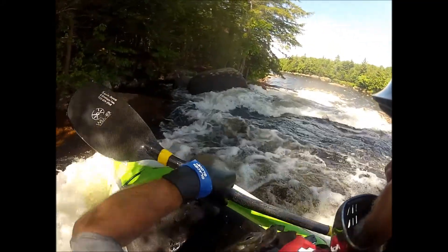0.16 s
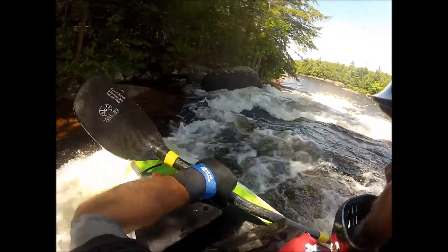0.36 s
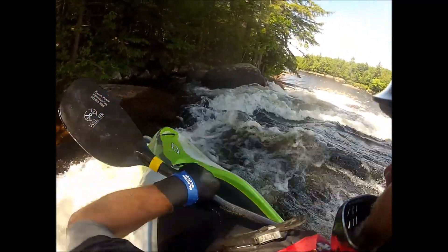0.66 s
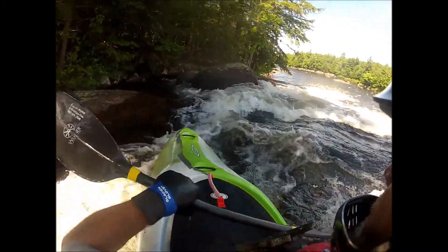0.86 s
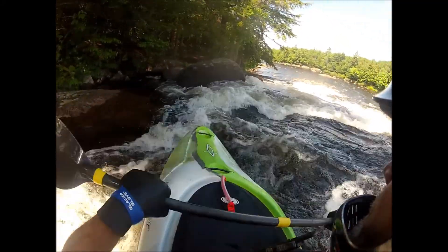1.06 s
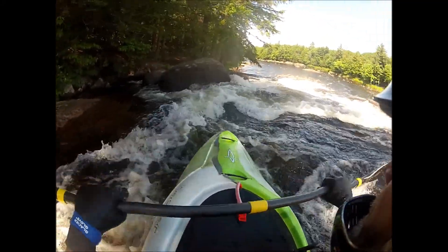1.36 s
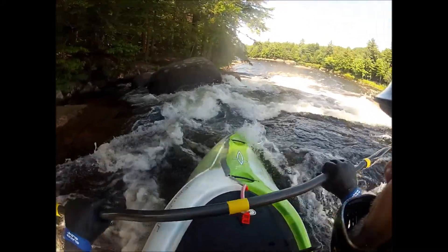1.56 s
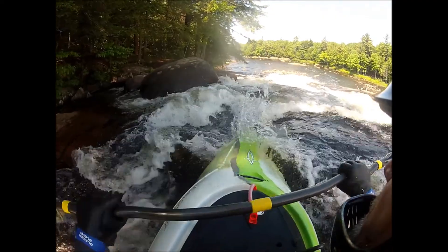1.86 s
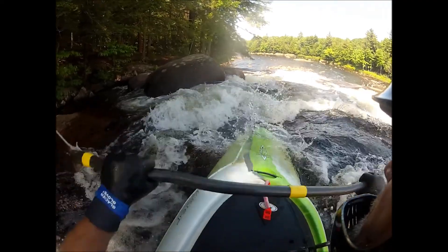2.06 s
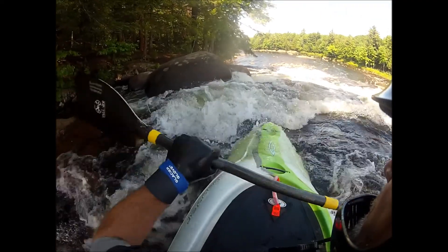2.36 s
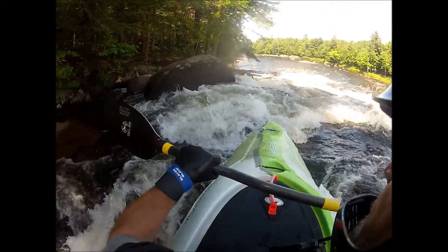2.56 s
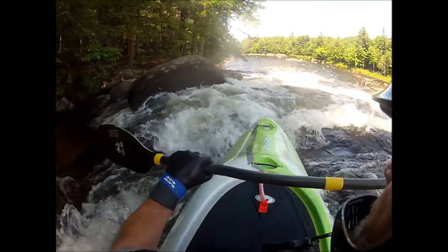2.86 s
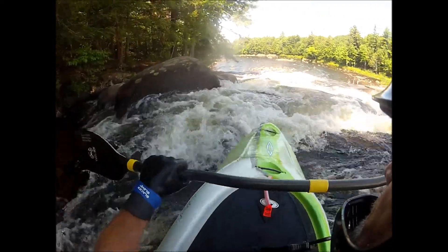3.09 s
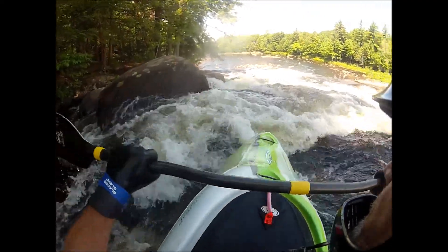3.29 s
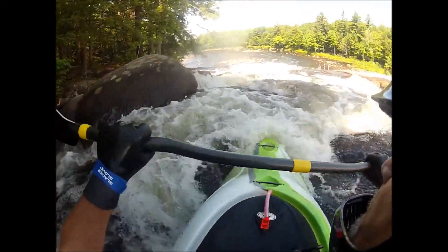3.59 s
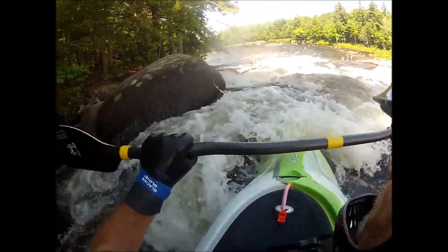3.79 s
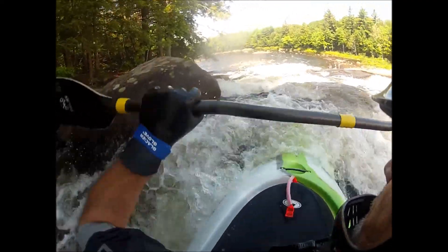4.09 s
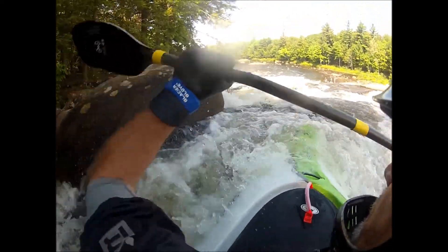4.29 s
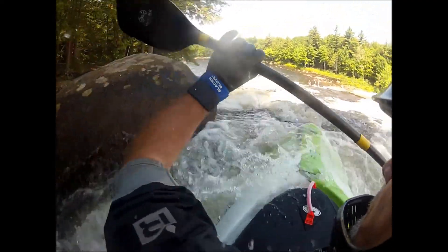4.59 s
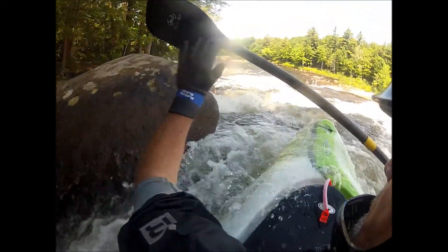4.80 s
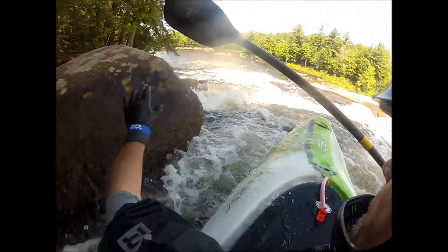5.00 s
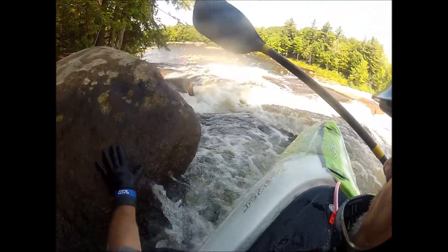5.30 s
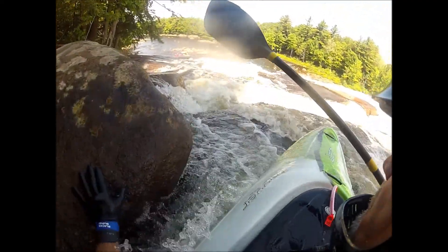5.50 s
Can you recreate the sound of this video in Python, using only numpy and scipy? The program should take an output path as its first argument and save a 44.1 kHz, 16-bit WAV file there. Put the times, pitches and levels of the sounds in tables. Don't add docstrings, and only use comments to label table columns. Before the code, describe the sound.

White water roars, muffled and boxy inside a sealed camera case, with hollow plastic raps, low hull thumps and deep jolting rumbles growing rougher midway.

```python
import sys
import numpy as np
from scipy import signal
from scipy.fft import rfft, irfft, next_fast_len
from scipy.io import wavfile
from scipy.ndimage import uniform_filter1d, map_coordinates

SR = 44100
rng = np.random.default_rng(int(sys.argv[2]) if len(sys.argv) > 2 else 0)


def to_wav(sig):
    pcm = np.clip(np.atleast_2d(sig), -1, 1) * 32767
    pcm = np.round(pcm).astype(np.int16)
    wavfile.write(sys.argv[1], SR, pcm.T)


def gain_from_db(level_db):
    decades = np.asarray(level_db, float) / 20
    return 10 ** decades


N = 249165

# (time [s], offset [dB], recovery [s])
OVERLOAD_JUMP = (3.7955, -9.5, .011)
LAPPING_DB = -46.5


def unit(x):
    return x / np.sqrt(np.mean(x ** 2) + 1e-20)


def curves(rows):
    s, *cols = np.transpose(rows)
    return [np.interp(np.arange(N) / SR, s, c) for c in cols]


def wobble(rate):
    return map_coordinates(rng.standard_normal(size=256), [np.arange(N) * rate / SR])


def filtered(x, response):
    m = next_fast_len(len(x) + 8192)
    spectrum = rfft(np.pad(x, (0, m - len(x)), "reflect"))
    return irfft(spectrum * response(np.fft.rfftfreq(m, 1 / SR)), m)[:len(x)]


def shape(points):
    f, v = np.transpose(points)
    return lambda hz: gain_from_db(np.interp(np.log(hz + 1), np.log(f + 1), v))


def froth(patchy_db):
    z = signal.stft(rng.standard_normal(N), nperseg=1024)[2]
    field = uniform_filter1d(rng.standard_normal(z.shape), 8, 0)
    field = uniform_filter1d(field, 4, 1)
    return signal.istft(z * gain_from_db(patchy_db * unit(field)), nperseg=1024)[1][:N]


def rapid():
    # (time [s], roar level [dB])
    nearness = [(0.0, -39), (0.57, -39.5), (1.01, -40.5), (1.21, -41), (1.56, -41), (1.89, -43),
                (3.11, -41.5), (3.32, -42.5), (3.52, -37), (3.67, -41), (3.9, -40), (4.26, -40.5),
                (4.58, -43.5), (4.8, -42.5), (5.16, -42), (5.37, -41.5), (5.52, -41.5), (5.65, -43.5)]
    # (frequency [Hz], width [Hz], level [dB])
    resonances = [(518, 116, -7), (857, 121, -5), (1116, 148, -4), (1257, 53.5, 2.5), (1450, 60, -8)]
    # (frequency [Hz], level per Hz [dB])
    surge_tone = [(120, -27.5), (190, -0.5), (250, -1), (400, -3.5), (600, -9), (1000, -36)]
    # (frequency [Hz], level per Hz [dB])
    spray_tone = [(900, -40.5), (1400, 1.5), (1700, -0.5), (2300, -0.5), (2700, -1), (2900, -7),
                  (2990, -28), (3010, -87)]

    roar_db, = curves(nearness)
    near_db = roar_db - roar_db.mean()
    waves_db = uniform_filter1d(pounding() - LAPPING_DB, size=SR // 3)
    surge_db = -47 + 0.18 * near_db + 0.58 * waves_db
    spray_db = -48.5 + 0.69 * near_db - 0.5 * np.arange(N) / SR
    swell = wobble(9.8)
    flutter = wobble(25)

    def cavity(f):
        total = 0
        for k, (centre, width, db) in enumerate(resonances):
            damping = 1j * f * width
            total = total + (-1) ** k * gain_from_db(db) * damping / (centre * centre - f * f + damping)
        return total / (1 + (f / 1500) ** 8)

    roar = unit(filtered(froth(patchy_db=1.5), cavity))
    surge = unit(filtered(froth(patchy_db=1.43), shape(surge_tone)))
    spray = unit(filtered(froth(patchy_db=1.0), shape(spray_tone)))
    roar = gain_from_db(roar_db + 2.0 + 0.6 * swell + 0.29 * flutter) * roar
    return roar + gain_from_db(surge_db) * surge + gain_from_db(spray_db + 0.49 * swell) * spray


def sway():
    # (time [s], pitch [Hz], level [dB])
    jolts = [(-0.016, 33.0, -26.5), (0.317, 32.0, -35.5), (0.379, 16.0, -30), (0.567, 16, -34),
             (0.898, 30.5, -34), (1.228, 31.0, -39.5), (1.788, 29.0, -39), (2.311, 13, -30),
             (2.331, 29.5, -41), (2.61, 31.5, -25), (2.983, 32.0, -33), (3.288, 29.0, -35.5),
             (3.345, 14.0, -27), (3.521, 17.0, -23.5), (3.542, 26, -22), (3.612, 34.0, -22),
             (3.825, 22, -15), (3.835, 31.0, -25.5), (4.057, 30.0, -12.5), (4.342, 27.0, -23.5),
             (4.441, 31.0, -20), (4.459, 15.55, -18.5), (4.603, 30, -31.5), (4.805, 14.0, -30.5),
             (4.989, 30, -33), (5.224, 14.0, -31.5), (5.302, 22, -30), (5.399, 19.0, -33),
             (5.528, 33.5, -32), (5.6, 19, -34)]
    rise_s, ring_s = .015, .12
    loose_db, tremble_db = -18, -49.5
    restless = .1

    ringing, shaking = np.zeros(N), np.zeros(N)
    for s, hz, db in jolts:
        t = np.maximum(np.arange(N) / SR - s, 0)
        reach = gain_from_db(db) * (1 - np.exp(-t / rise_s)) * np.exp(-t / ring_s)
        ringing += reach * np.sin(2 * np.pi * hz * t)
        shaking += reach
    noise = rng.standard_normal(N)
    rumble_tone = shape([(8, -37.5), (20, 10.5), (42, 6.0), (65, -11.0), (120, -33.5)])
    tremble_tone = shape([(8, -34), (16, -2), (24, -5), (31, -4.0), (45, -17), (90, -50)])
    rumble = unit(filtered(noise, rumble_tone))
    tremble = unit(filtered(noise[::-1], tremble_tone))
    tremble_level = gain_from_db(tremble_db) + restless * uniform_filter1d(shaking, size=SR)
    return ringing + gain_from_db(loose_db) * shaking * rumble + tremble_level * tremble


def held(x):
    padded = np.pad(x, (0, 147 * 1750 - N), "reflect")
    coarse = signal.resample(padded, 20 * 1750)
    return signal.resample(np.repeat(coarse, 8), 147 * 1750)[3:N + 3]


def pounding():
    # (time [s], level [dB], length [s])
    waves = [(.14, -44, 0.036), (.49, -44, .05), (1.0, -46, 0.072), (1.3, -46.5, .08), (2.36, -46, 0.065),
             (2.49, -47.5, .03), (2.61, -41.5, 0.02), (2.753, -45.5, .06), (3.272, -38.5, 0.045),
             (3.425, -42.5, .06), (3.62, -42.5, .14), (3.824, -34.5, 0.053), (4.071, -39.5, 0.023),
             (4.189, -37, .08), (4.407, -34.5, .04), (4.45, -43, .03), (4.565, -46, 0.045), (5.5, -50, .04)]
    t = np.arange(N) / SR
    power = gain_from_db(LAPPING_DB) ** 2
    for s, db, length in waves:
        power = power + gain_from_db(db) ** 2 * np.exp(-((t - s) / length) ** 2)
    return 10 * np.log10(power)


def hull():
    # (frequency [Hz], level per Hz [dB])
    thump_tone = [(25, -31.5), (50, -3), (75, -2), (130, 0), (180, -4.5), (260, -31)]
    return gain_from_db(pounding()) * unit(filtered(froth(patchy_db=1.24), shape(thump_tone)))


def raps():
    # (time [s], peak [dB], hollow mode [dB], thud [dB], contact [s])
    knocks = [(.3454, -28.5, -11.5, -20, .001), (.382, -33, -5, -24, 0.0013),
              (0.7343, -28.5, -2, -14.5, .0012), (1.512, -32, -18, -17, 0.017),
              (2.5662, -14, -9, -31, .00092), (2.587, -33, -24, -11, 0.0032),
              (3.5753, -24.5, -2, -5.5, 0.0045), (3.7900, -4, -11, -27.5, 0.0037),
              (3.8063, -21, -5.5, -6, .002), (3.8303, -22.5, -3.5, -2, .003),
              (4.0541, -26.5, -3.5, -1, 0.0044), (4.432, -38, 0, 1.5, .004),
              (4.5394, -25.5, -5.5, -9, .006), (4.555, -32, -5, -6, 0.0028),
              (4.585, -25.5, -9.5, -11.5, 0.0023), (4.880, -21.5, -14.5, -23.5, 0.004),
              (4.942, -36, -1, -15, 0.0032), (4.9614, -34, -6, -12.5, 0.008), (4.980, -37, -0.5, -17, .01),
              (5.4601, -14, -9, -28, .002), (5.4855, -28.5, -12, -15, 0.0027)]
    # (frequency [Hz], level [dB], time to fall 60 dB [s],
    # family [whole part: 0 main, 1 hollow, 2 thud, 3 bright])
    modes = [(1120, -1.5, 0.024, 0.5), (1200, -2.5, 0.018, 0.9), (943, -5.5, 0.053, 1),
             (785, 1.5, 0.041, 1.5), (444, -1.5, 0.034, 2.5), (344, -8, 0.02, 2), (205, -0.5, 0.034, 2),
             (1900, 0, 0.028, 3)]
    hard_db = -21.5
    splat_db, splat_t60_s = -2.5, 0.055

    out = np.zeros(N + SR)
    t = np.arange(SR // 8) / SR - .004
    luck = rng.standard_normal((len(knocks), len(modes), 3))
    cracks = rng.standard_normal((len(knocks), len(t)))
    for (s, db, hollow_db, thud_db, contact), draw, crack in zip(knocks, luck, cracks):
        bright_db = -22 + 0.56 * max(db - hard_db, 0)
        family_db = [0, hollow_db + 4.0, thud_db + 4.0, bright_db + 1.5]
        smear = np.clip(contact / 0.0018 - .5, 0, 2)
        crack_db = 1.8 * bright_db + 14 - 60 * np.maximum(t - contact, 0) / 0.015
        ring = gain_from_db(crack_db) * crack * (t > -.002)
        hiss = crack[::-1]
        wet = unit(uniform_filter1d(hiss, size=24) - uniform_filter1d(hiss, size=120))
        wet_db = splat_db + 0.62 * thud_db - 60 * np.maximum(t - contact / 2, 0) / splat_t60_s
        ring += smear / 2 * gain_from_db(wet_db) * wet * (t > -.001)
        for (hz, level, t60, family), (a, b, c) in zip(modes, draw):
            u = t + 0.0024 * (family == 3)
            shape_db = -60 * np.maximum(u - contact, 0) / t60 - 9 * (np.minimum(u, 0) / .001) ** 2
            mode_db = level + family_db[int(family)] + 1.4 * a + shape_db
            detune = 1 + (0.0073 + .007 * smear) * b
            ring += gain_from_db(mode_db) * np.cos(2 * np.pi * hz * detune * u + 0.66 * smear * c)
        out[round((s - .003) * SR):][:len(t)] += gain_from_db(db - 1.5) * ring
    return filtered(out[:N], lambda hz: hz < 2950)


def starved(x):
    # (time [s], fade [s], hold [s], lowest frequency [Hz], depth [0-1])
    gaps = [(1.002, .014, 0, 1600, .8), (2.645, .022, .001, 1750, 1), (3.606, .02, .001, 1600, 1),
            (3.671, .014, .002, 1600, 1), (4.329, .01, .002, 1600, 1), (4.4625, .004, .010, 1750, 1),
            (4.498, .003, .012, 2800, 1), (5.503, .015, .001, 1650, 1), (5.548, .015, .001, 1500, 1),
            (5.611, .016, .002, 1700, 1), (5.646, .012, 0, 1700, .85)]
    x, t = x.copy(), np.arange(N) / SR
    for s, fade, hold, lo_hz, depth in gaps:
        span = slice(round((s - .06) * SR), round((s + 0.067) * SR))
        quiet = filtered(x[span], lambda hz: (hz > lo_hz) & (hz < 4450) | (hz > 5350) & (hz < 6650))
        away = np.clip((np.abs(t[span] - s) - hold / 2) / fade, 0, 1)
        x[span] -= 0.96 * depth * quiet * (1 - away)
    return x


def split():
    # (time [s], lowest frequency [Hz], highest frequency [Hz], level [dB])
    splits = [
        (3.445, 5700, 6900, -64),
        (3.792, 300, 4280, -50),
        (3.83, 4300, 7800, -62),
        (3.973, 4200, 6180, -50),
    ]
    t = np.arange(N) / SR
    side = np.zeros(N)
    for s, lo_hz, hi_hz, db in splits:
        band = unit(filtered(rng.standard_normal(N), lambda hz: (hz > lo_hz) & (hz < hi_hz)))
        side += gain_from_db(db) * np.exp(-((t - s) / 0.0084) ** 2) * band
    return side


def bubbles():
    # (time [s], pitch [Hz], level [dB], time to fall 60 dB [s])
    pops = [
        (3.864, 2080, -38, .04),
        (4.471, 2200, -34, .03),
        (4.492, 2050, -40, .045),
        (3.775, 790, -28, .03),
    ]
    out, t = np.zeros(N), np.arange(SR // 10) / SR
    for s, hz, db, t60 in pops:
        envelope = gain_from_db(db - 60 * t / t60) * (1 - np.exp(-t / .002))
        out[round(s * SR):][:len(t)] += envelope * np.sin(2 * np.pi * hz * t * (1 + 1.5 * t))
    return out


def overload():
    s, db, recovery = OVERLOAD_JUMP
    t = np.maximum(np.arange(N) / SR - s, 0)
    overshoot = 0.15 * np.sin(np.pi * np.clip(t / .11, 0, 1))
    return gain_from_db(db) * ((1 - np.exp(-t / .003)) * np.exp(-t / recovery) - overshoot)


def limited(x):
    t = np.arange(N) / SR - OVERLOAD_JUMP[0] - .0006
    duck_db = -11 * np.clip(t / 0.00076, 0, 1) * np.exp(-np.maximum(t, 0) / .018)
    return gain_from_db(duck_db) * x / (1 + np.abs(x / 0.82) ** 4) ** 0.22


def scene():
    mono = rapid() + hull() + sway() + raps() + bubbles()
    return np.array([mono, mono])


def roll_off(x):
    return signal.sosfilt(signal.butter(12, 8810, fs=SR, output="sos"), x)


def record(dry):
    top = shape([(7600, -0.5), (7720, -16.5), (7900, -34.5), (8800, -50), (9200, -80.5)])
    x = filtered(starved(held(limited(dry[0]))), top)
    x = x * np.clip((N - np.arange(N)) / (.004 * SR), 0, 1)
    side = split()
    return roll_off(np.array([x + side, x - side + overload()]))


dry = scene()
out = record(dry)
to_wav(out)
```